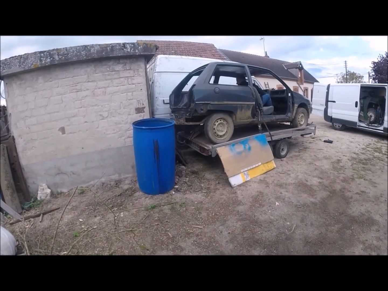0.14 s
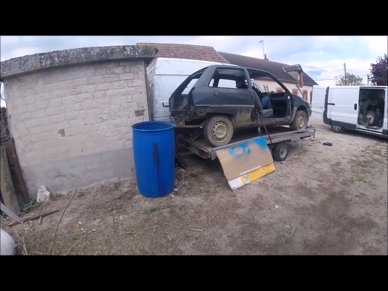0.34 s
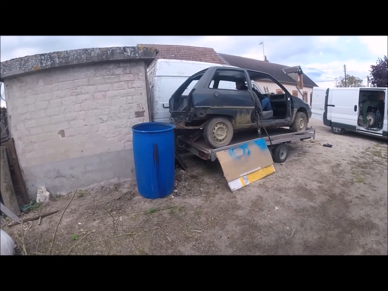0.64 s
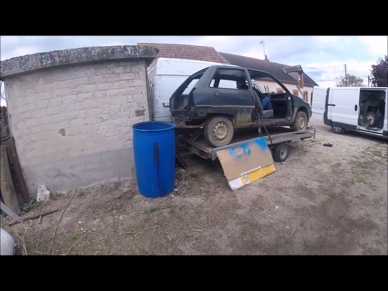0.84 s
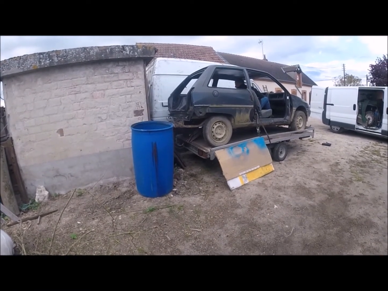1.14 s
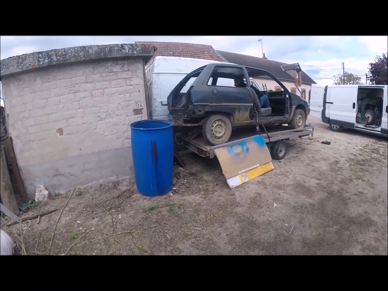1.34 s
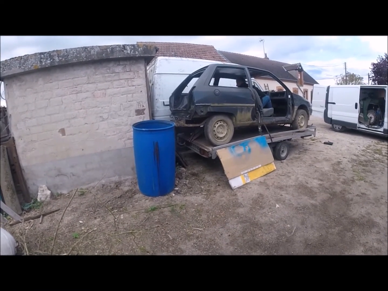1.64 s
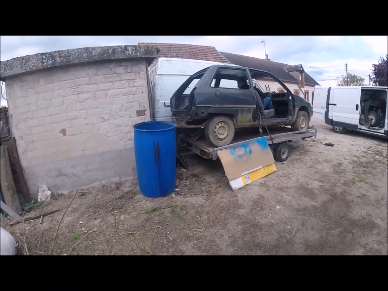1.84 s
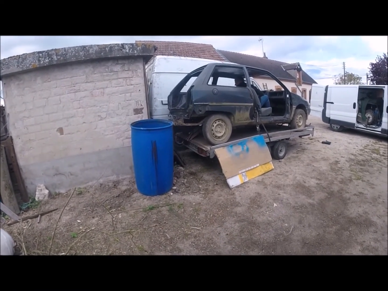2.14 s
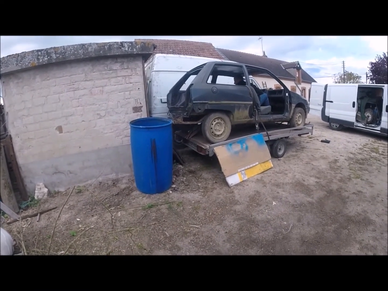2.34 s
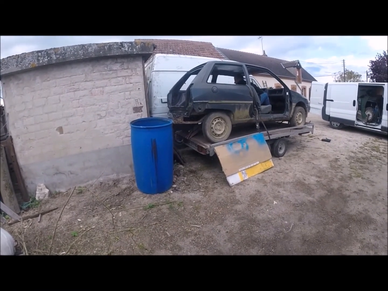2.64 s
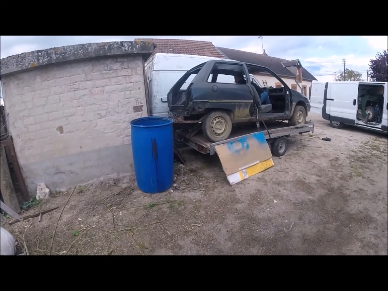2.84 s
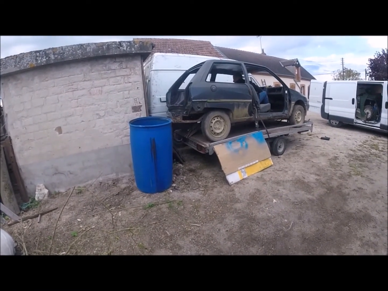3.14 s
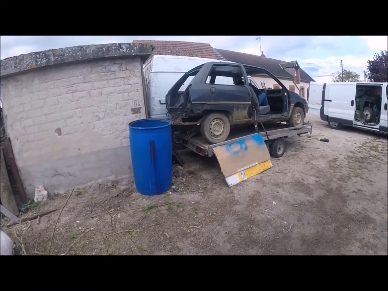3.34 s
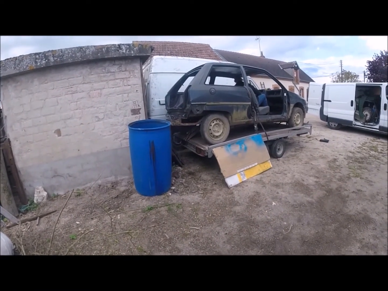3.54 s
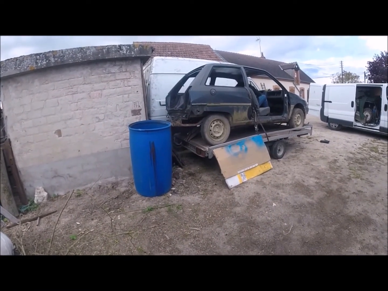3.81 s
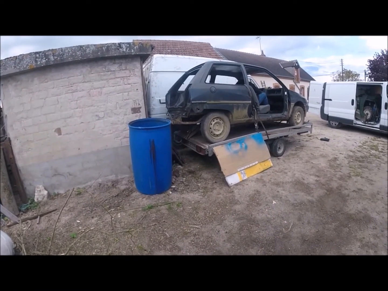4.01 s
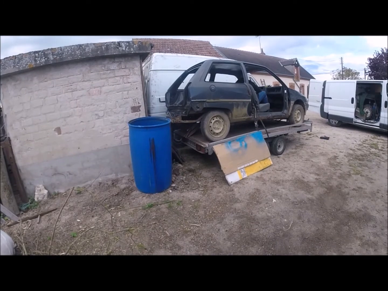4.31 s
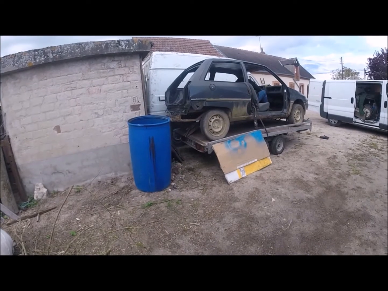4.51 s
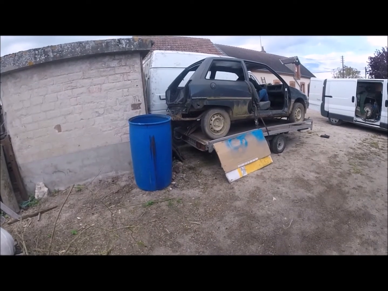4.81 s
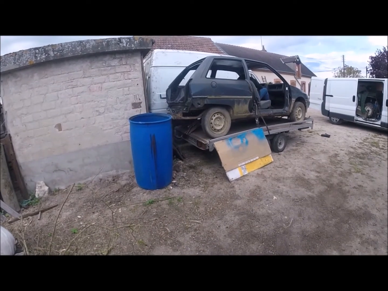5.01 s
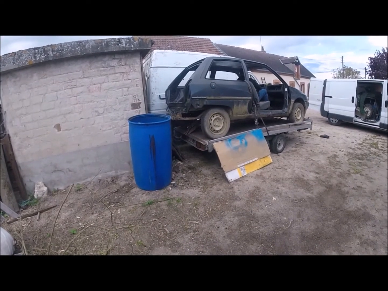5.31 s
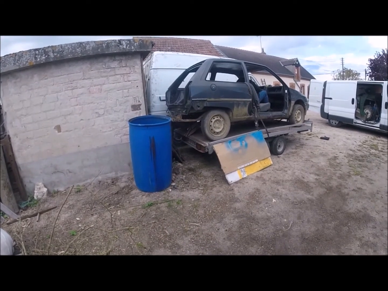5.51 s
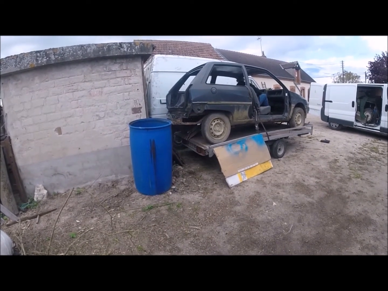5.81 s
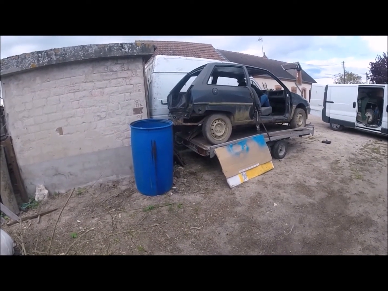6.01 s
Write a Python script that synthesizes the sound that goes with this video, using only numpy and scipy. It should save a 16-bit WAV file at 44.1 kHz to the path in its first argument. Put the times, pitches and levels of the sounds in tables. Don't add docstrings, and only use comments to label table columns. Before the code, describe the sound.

In a walled outdoor yard, a small four-cylinder engine with a raspy open exhaust is stabbed through five quick throttle blips, backfires cracking between them. It is then held flat out in a harsh, slightly stuttering scream, released into a long falling, hissing run-down, and blipped once more with bangs. A boxed-in action-camera microphone makes it hard, mid-heavy and slightly crunchy, with faint wind rumble.

```python
import sys
import numpy as np
from scipy import signal
from scipy.fft import rfft, irfft, next_fast_len
from scipy.io import wavfile
from scipy.ndimage import uniform_filter1d, map_coordinates

SR = 44100
rng = np.random.default_rng(int(sys.argv[2]) if len(sys.argv) > 2 else 0)


def rack_gain(trim_db):
    fader = np.asarray(trim_db, float)
    return 10 ** (fader / 20)


def to_wav(sig):
    pcm = np.clip(np.atleast_2d(sig), -1, 1) * 32767
    pcm = np.round(pcm).astype(np.int16)
    wavfile.write(sys.argv[1], SR, pcm.T)


N = 271640


def unit(x):
    return x / np.sqrt(np.mean(x ** 2) + 1e-20)


def along(points, hz):
    f, v = np.transpose(points)
    return np.interp(np.log(hz + 1), np.log(f + 1), v)


def curves(rows):
    s, *cols = np.transpose(rows)
    return [np.interp(np.arange(N) / SR, s, c) for c in cols]


def wobble(rate):
    knots = rng.standard_normal(int(N * rate / SR) + 4)
    return map_coordinates(knots, [np.arange(N) * rate / SR])


def bump(s, half_s):
    return np.exp(-((np.arange(N) / SR - s) / half_s) ** 2)


def coloured(x, gain):
    m = 2 * next_fast_len(N // 2 + 8192)
    cepstrum = irfft(np.log(gain(np.fft.rfftfreq(m, 1 / SR)) + 1e-6), m)
    cepstrum[1:m // 2] *= 2
    cepstrum[m // 2 + 1:] = 0
    return irfft(rfft(x, m) * np.exp(rfft(cepstrum)), m)[..., :N]


def spikes(seconds, sizes):
    at = np.clip(seconds * SR, 8, N - 9)[:, None]
    taps = np.floor(at).astype(int) + np.arange(-7, 9)
    kernel = np.sinc(taps - at) * np.cos(np.pi * (taps - at) / 16) ** 2
    return np.bincount(taps.ravel(), (sizes[:, None] * kernel).ravel(), N)


# centre in Hz, width in Hz, level in dB.
RESONANCES = [(140, 22, -12.5), (256.2, 47, -10), (416.7, 27.3, -5), (495, 34.4, -1), (671.4, 46, -3),
              (788, 48, -2), (902, 44.3, -5), (1170, 32, -6.5), (1506, 105, 4.5), (1800, 180, -6),
              (2103, 106, -4), (2779, 348, -1), (3080, 34, 1.5), (3430, 141, 1), (4102, 157, -4),
              (4506, 175, 0), (4950, 274, -2), (5334, 317, -2), (5856, 220, -9), (6800, 600, -14),
              (7325, 397, -11), (9120, 1090, -23.5), (10600, 1300, -30), (12500, 3300, -39.5)]


def path(hz):
    return np.sqrt(sum(rack_gain(2 * db) / (1 + ((hz - c) / w) ** 2) ** 2 for c, w, db in RESONANCES))


# opens in seconds, shuts in seconds, rasp on opening in dB, rasp settled in dB.
PEDAL = [
    (-.02, 0.324, -27.5, -23.5),
    (0.627, 0.715, -28, -24.5),
    (0.873, 1.059, -28.5, -22),
    (1.303, 1.434, -29.5, -27),
    (1.63, 1.807, -26, -24.5),
    (2.004, 3.605, -26, -20),
    (5.662, 5.992, -23, -18),
]
# time after shutting in seconds, opening 0-1.
CLOSING = [(0, 0.87), (.007, .6), (.028, .45), (.045, 0)]
OPEN_S = 0.0069


def pedal():
    opens, shuts = np.transpose(PEDAL)[:2]
    t = np.arange(N) / SR
    stroke = np.clip(np.searchsorted(opens - OPEN_S, t) - 1, 0, None)
    down = np.clip((t - opens[stroke]) / OPEN_S + 1, 0, 1)
    closing = np.interp(t - shuts[stroke], *np.transpose(CLOSING))
    return down * closing, stroke, np.abs(t - opens[stroke])


# firing rate in Hz on opening, halfway, just after shutting, then rasp coasting
# afterwards in dB.
REVS = [(189.6, 209, 222.5, -45.5), (208.6, 212, 215, -48.5), (200.6, 208.5, 214, -46),
        (202.8, 205, 210.5, -48), (195.4, 210, 208, -51.5), (186.9, 235, 232, -44),
        (77.12, 107, 132.5, -45.5)]
# time in seconds, firing rate
# in Hz.
LONG_CLIMB = [(.53, 203.4), (2.17, 203.5), (2.3, 213.7), (2.42, 221.6), (2.64, 232.7)]
# time in seconds, firing rate in Hz.
RUN_DOWN = [(3.78, 212.1), (3.93, 195.6), (4.2, 167.7), (4.47, 146.2), (4.77, 123.9), (5.16, 99.47),
            (5.4, 86.8), (5.65, 73.04), (6.09, 123.6), (6.2, 125)]


def speed():
    overrun_s = .02
    knots = LONG_CLIMB + RUN_DOWN
    for (a, b, *_), (start, half, peak, _) in zip(PEDAL, REVS):
        knots = knots + [(a, start), ((a + b) / 2, half), (b + overrun_s, peak)]
    return curves(sorted(knots))[0]


# firing rate in Hz, level in dB.
COAST_RASP = [(73, -18), (90, -12), (110, -7), (140, -3.5), (175, 0.5), (200, -1.5), (230, -2.5)]
# the order's own pitch in Hz, level in dB.
FIRST_OPEN = [(78, -32), (93, -38.5), (117, -28), (132, -27), (200, -43.5), (215, -35.5), (232, -39)]
FIRST_SHUT = [(73, -55), (81, -49), (86.6, -61), (96, -39.5), (125, -39), (172, -32.5), (196, -43),
              (213, -42.5)]
SECOND_OPEN = [(155, -24), (185, -34), (250, -29), (264, -49), (400, -44.5), (430, -40), (470, -37.5)]
SECOND_SHUT = [(150, -61), (173, -45), (213, -38.5), (250, -44), (292, -52.5), (335, -58), (365, -47.5),
               (420, -57)]
# firing rate in Hz, level in dB.
DRONE_OPEN = [(80, -8.5), (130, -6.5), (205, -9), (235, -9.5)]
# one-cylinder-in-four unevenness 0-1,
# every-other-cylinder unevenness 0-1, gas noise over pulses in dB.
BURN_OPEN = [(.15, .2, -1), (.2, .2, -1), (.25, .2, -1), (.3, .25, 1), (.9, .3, 4), (.15, .15, -4),
             (.2, .1, 0)]
BURN_SHUT = (.2, .8, 2)
# from in seconds, to in seconds, fade in seconds,
# added one-in-four unevenness 0-1, added every-other unevenness 0-1.
VALVE_FLOAT = (2.65, 3.25, .12, .4, .27)
# time in seconds, half length in seconds, level change in dB.
STUMBLES = [
    (0.51, 0.015, -9),
    (0.598, 0.029, 5),
    (1.272, 0.029, -14),
    (1.603, 0.013, -7),
    (1.7, 0.011, -7),
    (1.733, .01, -3.5),
    (1.784, 0.011, -8),
    (3.06, 0.017, -2),
]


def load(rate):
    opened, stroke, since = pedal()

    def blend(when_open, when_shut):
        return opened * when_open + (1 - opened) * when_shut

    first, settled = np.transpose(PEDAL)[2:, stroke]
    building = settled + (first - settled) * np.exp(-since / 0.15)
    coasting = np.transpose(REVS)[-1, stroke] + along(COAST_RASP, rate)
    lost_db = sum(db * bump(s, half) for s, half, db in STUMBLES)
    rasp_db = blend(building, coasting) + lost_db
    drone_db = blend(along(DRONE_OPEN, rate), 2)
    first_db = blend(along(FIRST_OPEN, rate), along(FIRST_SHUT, rate)) + lost_db
    second_db = blend(along(SECOND_OPEN, 2 * rate), along(SECOND_SHUT, 2 * rate)) + lost_db
    fourth, other, gas_db = blend(np.transpose(BURN_OPEN)[:, stroke], np.array(BURN_SHUT)[:, None])
    a, b, fade, more, alternate = VALVE_FLOAT
    floating, = curves([(a - fade, 0), (a, 1), (b, 1), (b + fade / 2, 0)])
    burn = fourth + more * floating, other + alternate * floating, gas_db
    return rasp_db, drone_db, (first_db, second_db), burn


def panels(x):
    for delay_ms in (.3, .7, 1.5):
        loop = np.r_[1, np.zeros(round(delay_ms * SR / 1000) - 1), -.55]
        x = signal.lfilter(loop[::-1], loop, x)
    return x


# size trend, early or late in ms, reflection delay trend in ms.
CYLINDERS = [(-0.45, 0.086, 0.44), (1, -0.24, -0.756), (-1.3, 0.2, -0.0075), (0.37, -0.21, -0.25)]
# frequency in Hz, gain in dB.
PULSE_TILT = [(300, -3), (480, -.5), (850, -3), (1500, 1), (3400, 1), (5500, -2), (8000, -4), (15000, -3)]
# frequency in Hz, gain in dB.
GAS_TILT = [(200, -20), (700, -16), (1500, -9), (3000, -4), (5000, -2), (9000, 3), (15000, 3)]
# frequency in Hz, gain in dB.
COAST_TILT = [(200, -27), (700, -7.5), (1100, -0.5), (1500, 7.5), (3000, 6), (5000, 0), (9000, -2),
              (12000, 0), (15000, -10)]
ONE_FIRING_S = 5.6735


def exhaust(jitter_s, scatter_db, echo_ms, echo_gain, puff_s, split_hz):
    rate = speed()
    rasp_db, drone_db, (first_db, second_db), (fourth, other, gas_db) = load(rate)
    opened = pedal()[0]
    shut = 1 - opened
    turn = np.cumsum(rate) / SR
    turn -= turn[round(ONE_FIRING_S * SR)] % 1
    count = np.arange(1, int(turn[-1]))
    at = np.searchsorted(turn, count)
    times = np.interp(count, turn, np.arange(N) / SR)

    size, late, back = np.transpose(CYLINDERS)[:, count % 4]
    luck = rng.standard_normal((len(count), 3))
    uneven = np.abs(1 + fourth[at] * size + other[at] * (-1.) ** count)
    sizes = uneven * rack_gain(scatter_db * (.3 + .7 * opened[at]) * luck[:, 0])
    front = spikes(times + fourth[at] * late / 1000 + jitter_s * luck[:, 1], sizes)
    front -= 2 * rate / SR * (np.cos(2 * np.pi * turn) + np.cos(4 * np.pi * turn))
    delay = (echo_ms + fourth[at] * back) / 1000
    pulses = front + echo_gain * spikes(times + delay + jitter_s * luck[:, 2], sizes)
    pulses = unit(pulses / np.sqrt(rate))

    puff = np.exp(-np.arange(SR // 20) / (puff_s * SR))
    releases = spikes(times, sizes ** 2) + .6 * spikes(times + delay, sizes ** 2)
    gate = np.abs(signal.fftconvolve(releases, puff)[:N])
    gate = gate / uniform_filter1d(gate, size=1500) + 1.2
    gas = unit(gate * rack_gain(1.14 * wobble(40)) * rng.standard_normal(N))

    sharp = coloured(panels(pulses), lambda hz: rack_gain(along(PULSE_TILT, hz)))
    soft = coloured(pulses, lambda hz: 1 / (1 + (hz / 1300) ** 4))
    hiss = rack_gain(1.16 * wobble(25)) * rng.standard_normal(N)
    hiss = coloured(hiss, lambda hz: rack_gain(along(COAST_TILT, hz)))
    puffs = coloured(gas, lambda hz: rack_gain(along(GAS_TILT, hz)))
    share = 1 / np.sqrt(1 + rack_gain(2 * gas_db))
    source = share * (opened * (sharp + rack_gain(gas_db) * puffs) + shut * (soft + rack_gain(gas_db) * hiss))

    def high(hz):
        return 1 / np.sqrt(1 + (split_hz / (hz + 1)) ** 12)

    rasp = coloured(rack_gain(rasp_db + 11.5) * source, lambda hz: path(hz) * high(hz))
    drone = coloured(rack_gain(rasp_db + drone_db + 24.5) * source,
                     lambda hz: path(hz) * np.sqrt(1 - high(hz) ** 2))
    hum = rack_gain(first_db + 2.87 * wobble(14)) * np.sin(2 * np.pi * turn + 0.24 * wobble(16))
    hum += rack_gain(second_db + 1.2 * wobble(15)) * np.sin(4 * np.pi * turn + .15 * wobble(20))
    return rasp + drone, np.sqrt(2) * hum


# frequency in Hz, density in dB per Hz.
AIR = [(20, -13), (45, -8), (90, -12.5), (200, -0.5), (400, -19), (1000, -52.5)]
# time in seconds, half length in seconds, level in dB.
GUSTS = [
    (1.28, 0.064, -65),
    (1.72, 0.074, -54),
    (2.973, 0.25, -59),
    (4.69, 0.5, -59),
    (5.6, 0.24, -66),
    (5.989, 0.073, -48),
    (4.71, 0.0095, -55),
]


def rumble():
    still_db, shake_db, shake_s = -64.5, -59, .05
    noise = unit(coloured(rng.standard_normal(N), lambda hz: rack_gain(along(AIR, hz))))
    shakes = [(s, shake_s, shake_db) for row in PEDAL for s in row[:2]]
    level = rack_gain(still_db) + sum(rack_gain(db) * bump(s, half) for s, half, db in shakes + GUSTS)
    return level * rack_gain(7.0 + 0.85 * wobble(22)) * noise


# frequency in Hz, time to fall 60 dB in seconds.
YARD = [(200, 0.29), (1500, 0.22), (8000, 0.015)]


def yard(x):
    hz, t, z = signal.stft(rng.standard_normal(SR // 2), SR, nperseg=256)
    decay = rack_gain(-60 * t / along(YARD, hz)[:, None])
    tail = signal.istft(z * decay, SR, nperseg=256)[1]
    return signal.fftconvolve(np.pad(x, (400, 0)), tail / np.linalg.norm(tail))[:N]


# start in seconds, peak in dB, thump in dB, rise in ms.
BANGS = [(0.5118, -9.5, -22, 0.43), (0.6367, -19, -35, 1.3), (.862, -13.5, -19, 5.34),
         (1.2518, -10, -23, 2.46), (1.616, -13.5, -34, 5.6), (1.695, -22, -20, 8.4),
         (1.742, -18.5, -18, 14), (1.782, -20.5, -20, 14), (1.628, -21.5, -25, 1.5), (1.8487, -38, -12, 1),
         (2.0024, -15, -21, 1.3), (2.0882, -16.5, -15, 2), (5.66, -15, -15.5, 0.48),
         (5.688, -18, -11.5, 0.58), (5.842, -18, -8, 2.04), (5.909, -21, -7, 2.4)]
# frequency in Hz, gain in dB.
BLAST_TILT = [(300, -2), (700, -0.5), (1500, 1), (3000, 0), (8000, -1), (15000, 2.5)]


def backfires():
    t = np.arange(SR // 20) / SR
    blast, push = np.zeros(N + SR), np.zeros(N + SR)
    for s, db, thump_db, rise_ms in BANGS:
        here = slice(round(s * SR), round(s * SR) + len(t))
        late = np.maximum(t - rise_ms / 1000, 0)
        rise = np.minimum(1000 * t / rise_ms, 1) ** 2
        burst = rise * (np.exp(-(late / 0.0046) ** 3) + 0.22 * rack_gain(-60 * late / 0.085))
        blast[here] += rack_gain(db + 6.0) * burst * rng.standard_normal(len(t))
        thump = (late / .0012 - 1) * np.exp(-late / .001) * (1 - np.exp(-late / .00019))
        push[here] += rack_gain(db + thump_db + 15.5) * thump
    return coloured(blast[:N], lambda hz: path(hz) * rack_gain(along(BLAST_TILT, hz))) + push[:N]


def scene():
    bark, hum = exhaust(jitter_s=.000012, scatter_db=2.1, echo_ms=2.2, echo_gain=0.48,
                        puff_s=0.0076, split_hz=1070)
    near = bark + backfires()
    return (near + rack_gain(-11) * yard(near) + hum + rumble())[None]


# centre in seconds, length in seconds,
# threshold below the strongest line in dB.
THINNED = [(.145, .04, -16), (.262, .04, -15), (.772, .04, -15), (.847, .06, -13), (1.146, .045, -15),
           (1.322, .045, -12), (1.885, .04, -16), (1.914, .04, -14), (1.96, .045, -15), (2.123, .075, -8),
           (2.204, .045, -11), (2.265, .045, -12), (2.508, .05, -9), (2.563, .045, -11), (2.595, .045, -11),
           (2.786, .05, -10), (2.842, .045, -12), (3.055, .065, -9), (5.457, .045, -18), (5.515, .055, -16),
           (5.573, .075, -14)]


def thin_out(x):
    out = x.copy()
    for s, length, keep_db in THINNED:
        n = round(length * SR)
        start = round(s * SR) - n // 2
        part = slice(start, start + n)
        lines = rfft(x[0, part] * signal.windows.tukey(n, .4))
        top = np.abs(lines[1000 * n // SR:]).max()
        kept = rack_gain(2) / (1 + (top * rack_gain(keep_db) / (np.abs(lines) + 1e-9)) ** 8)
        out[0, part] -= irfft(lines * (1 - kept), n) * np.hanning(n)
    return out


def band_limit(x):
    return signal.sosfilt(signal.butter(12, 15820, fs=SR, output="sos"), x)


def record(dry):
    mix = thin_out(dry)
    return band_limit(mix)


dry = scene()
out = record(dry)
to_wav(out)
```